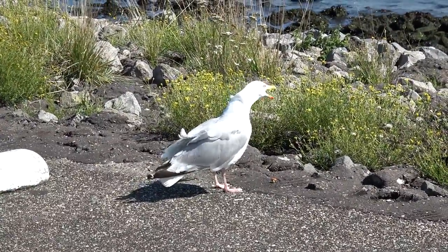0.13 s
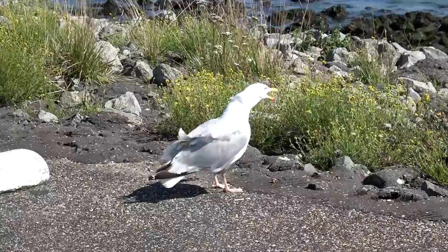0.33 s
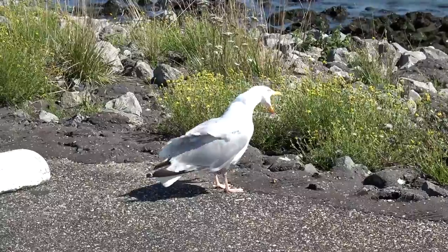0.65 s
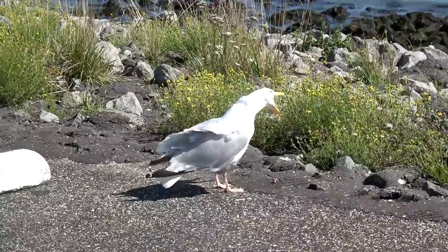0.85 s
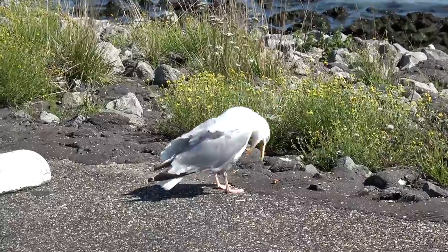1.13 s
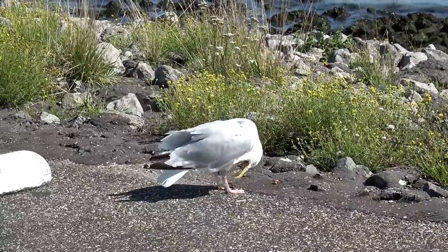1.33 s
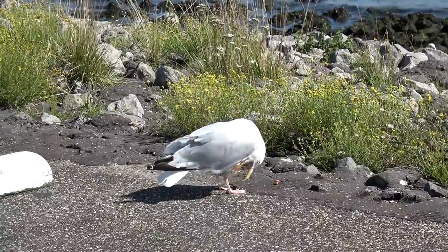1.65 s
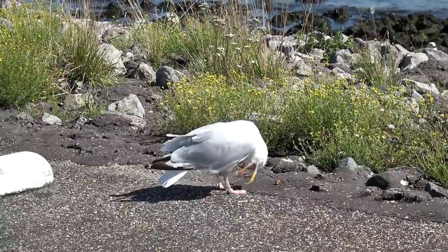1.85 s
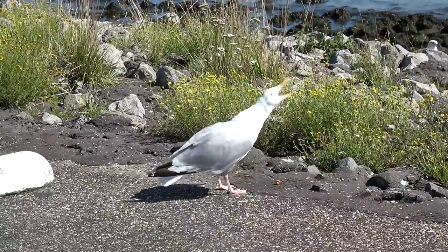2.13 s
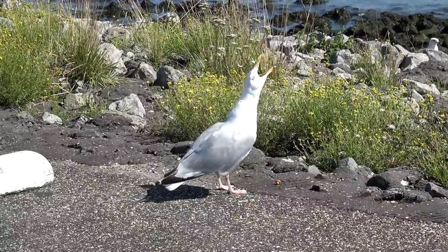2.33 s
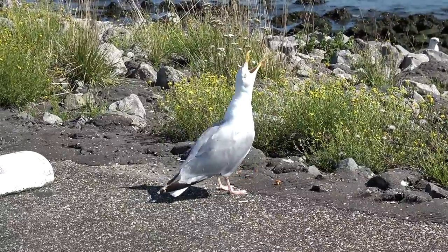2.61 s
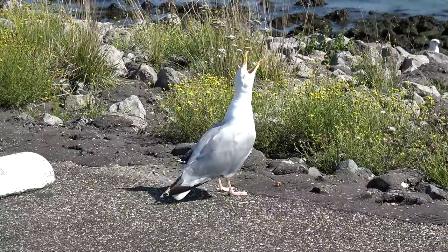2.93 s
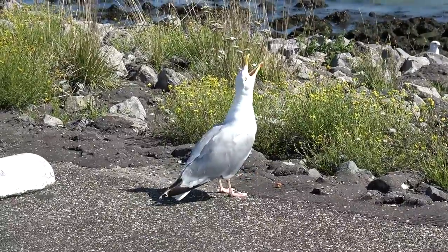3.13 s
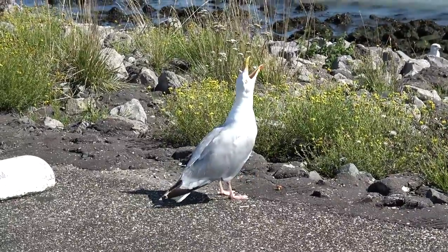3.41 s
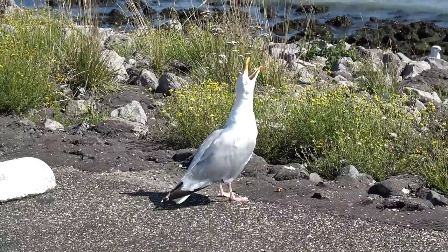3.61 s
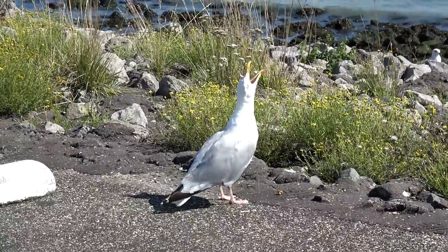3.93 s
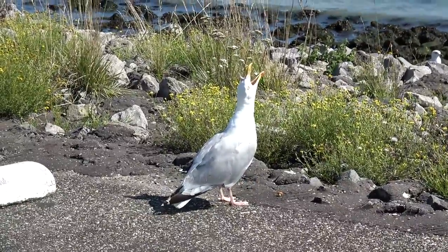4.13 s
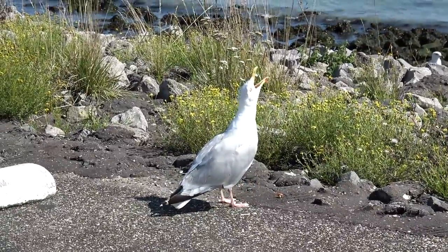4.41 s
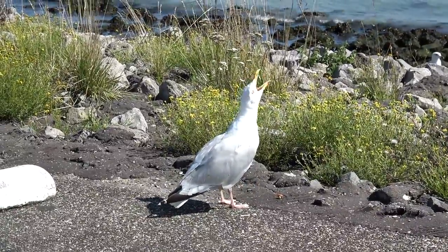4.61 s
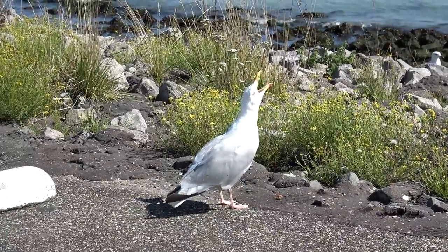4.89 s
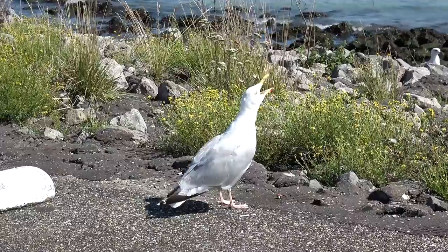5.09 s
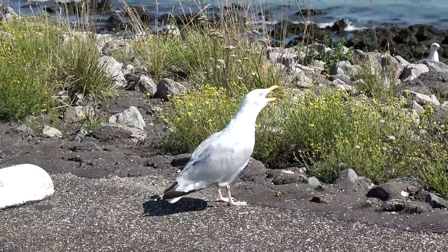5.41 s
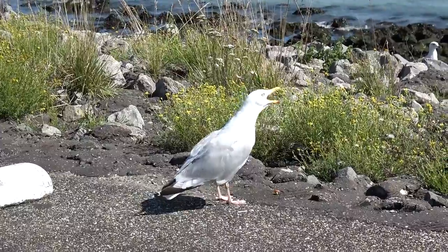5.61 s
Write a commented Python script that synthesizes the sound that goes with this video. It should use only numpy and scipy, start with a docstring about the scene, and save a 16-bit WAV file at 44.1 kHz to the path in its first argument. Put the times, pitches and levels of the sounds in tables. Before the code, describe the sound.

Two large gulls call over each other on a rocky shore, a mewing, wailing bird breaking into loud rapid yelps above faint low surf.

```python
"""A gull's mew and a small tick open the scene, then a second gull yelps and the two duel.
Each yelp starts as a rasp of irregular slaps, locks into a stack of harmonics, may flip to an upper
register, and falls in pitch. Turbulent hiss rides on the sharper pulses of the two voices.
The rocks answer with faint delayed copies and a decaying scatter of noise.
Shaped noise makes the low surf and breeze, and a wavering sine the distant hum beneath them."""
import sys
import numpy as np
from scipy import signal
from scipy.fft import rfft, irfft, next_fast_len
from scipy.io import wavfile
from scipy.ndimage import uniform_filter1d, minimum_filter1d, map_coordinates

SR = 44100
rng = np.random.default_rng(int(sys.argv[2]) if len(sys.argv) > 2 else 0)


def master(y):
    """Save y as 16-bit WAV."""
    cut = np.clip(np.atleast_2d(y).T, -1, 1)
    pcm = np.round(cut * 32767)  # scale
    wavfile.write(sys.argv[1], SR, pcm.astype(np.int16))


N = 253575  # length in samples
TOP_HZ = 15700  # upper band limit of the whole scene

# Yelps of the two birds. Each row: start in seconds; durations of rasp, rise, upper register and fall
# in seconds; crest pitch (before any flip) in Hz, pitch early in the fall in Hz; effort in dB before
# throat and envelope; offsets of the second and third harmonics in dB.
CALLER_YELPS = [ (2.2, 0.042, 0.056, 0.081, 0.02, 1157, 1040, -7.5, 1.5, 1),
                (2.5, 0.038, 0.062, 0.074, 0.019, 1159, 1077, -5.5, -0.5, 0.5),
                (2.81, 0.035, 0.059, 0.068, 0.026, 1148, 1060, -7, 0.5, 0),
                (3.105, .053, 0.057, 0.059, 0.03, 1143, 1050, -7.5, 0, 0),
                (3.418, 0.037, 0.057, 0.06, 0.03, 1145, 1045, -7.5, 0, 0),
                (3.724, 0.035, 0.059, 0.033, 0.057, 1136, 1055, -7, -0.5, 0),
                (4.03, .04, .065, 0.00053, 0.082, 1136, 1064, -6.5, -0.5, 0.5),
                (4.342, 0.039, 0.059, 0, .087, 1131, 1068, -6, 0, -0.5),
                (4.656, 0.043, 0.062, 0.0047, 0.073, 1151, 1053, -6, -2, -1.5),
                (4.967, 0.046, 0.049, 0, 0.09, 1137, 1055, -5.5, 1, -1.5)]
RIVAL_YELPS = [ (.212, 0.025, 0.2, 0, 0.059, 1291, 1238, -5.5, -16, 4.5),
               (.597, 0.03, 0.072, 0.00052, 0.059, 1187, 1152, -6, -1, -6.5),
               (.882, 0.03, 0.071, 0.00017, 0.064, 1206, 1136, -6.5, 1, -4),
               (1.172, 0.032, 0.064, 0.0016, 0.061, 1202, 1136, -5, 0, -5),
               (1.465, .03, .062, 0.0093, 0.057, 1216, 1121, -6.5, 0, -5),
               (1.76, .035, 0.044, 0.026, 0.045, 1218, 1123, -6.5, -4, -2),
               (2.068, .037, 0.035, 0.021, 0.052, 1213, 1098, -7, -5.5, 0),
               (2.385, 0.023, .023, 0.023, 0.056, 1216, 1110, -10.5, -5.5, 1.5),
               (2.69, 0.033, 0.021, 0.031, 0.057, 1181, 1086, -12.5, -4, 2.5),
               (3.11, .02, 0.01, 0.017, 0.057, 1158, 1058, -14.5, -4, -0.5)]
# Sharpness of the pulses, a row each for the rise, the upper register and the fall.
# Each row: offset of the third harmonic in dB, offset of the high overtones in dB.
CALLER_EDGE = [(1.5, -1.5), (-1.5, 0), (.5, -2)]
RIVAL_EDGE = [(-4.5, 0.5), (-9, 7), (1.5, -0.5)]
# Other notes of the caller, long and short, one curve each: mews, wails, squeals and two short
# closing barks. Each row of a curve: time in seconds, pitch in Hz, effort in dB before the throat.
MEWS = [
    [(0, 954.5, -14), (.214, 943.5, -14)],
    [(.675, 971, -12), (.79, 981, -11.5), (.97, 1078, -13), (1.022, 1000, -14)],
]
WAILS = [
    [(1.27, 1174, -10.5), (1.405, 1181, -9.5), (1.415, 1287, -11), (1.455, 1329, -16), (1.645, 1392, -11.5)],
    [(1.653, 1161, -9.5), (1.675, 1108, -2.5), (1.697, 856, -18)],
    [(1.885, 1124, -10.5), (1.93, 1170, -9.5), (2.008, 1219, -8), (2.034, 1408, -8)],
]
SQUEALS = [
    [(1.456, 1926, -0.5), (1.49, 1999, -8), (1.633, 2022, -7), (1.642, 1645, -6), (1.657, 1535, -0.5)],
    [(2.032, 2026, -2.5), (2.083, 1963, -3), (2.087, 1402, 0), (2.104, 1240, -14.5)],
]
CLOSING_BARKS = [
    [(5.35, 1199, -9), (5.368, 1239, -12.5), (5.43, 1132, -4.5), (5.455, 1152, -8)],
    [(5.714, 1228, -15), (5.75, 1264, -4)],
]
# Posture of the caller. Each row: time in seconds, lift of the head (0 bowed, 1 thrown back, beak wide).
HEAD = [(2.28, 0.023), (2.39, 0.87), (5.15, 1), (5.45, 0.53)]
# Resonances of throat and beak that the three lowest harmonics sweep through: the caller bowed, the
# caller with its head back, and the rival. Each row: frequency in Hz, gain in dB.
BOWED = [(950, -12.5), (1080, -20.5), (1190, 0), (1550, -5), (1950, -8.5), (2300, -8), (2620, -22.5),
         (2900, -35.5), (3200, -19), (3520, -18), (3850, -31), (6000, -37.5)]
RAISED = [(880, -18.5), (1010, -11.5), (1070, -6.5), (1150, -0.5), (1230, 0.5), (1320, -2.5), (1800, -21.5),
          (2040, -15.5), (2400, -23.5), (2600, -8.5), (2780, -11.5), (3080, -3), (3220, -11), (3420, -27.5),
          (3600, -24.5), (3900, -26.5)]
RIVAL_THROAT = [(880, -10.5), (1090, -2.5), (1220, -1.5), (1390, -5.5), (1900, -17.5), (2400, -13.5),
                (2900, -11.5), (3250, -7.5), (3600, -23.5), (4100, -41.5)]
# Throat colour of the high overtones, relative to the strength of the low ones.
# Each row: frequency in Hz, gain in dB.
THROAT = [(3900, -15.5), (4350, -17.5), (4700, -24), (5300, -34.5), (6200, -32), (7400, -40), (8600, -45),
          (10000, -50), (12000, -47.5), (15000, -65.5)]
# Strain in both voices. Each row: time in seconds, added sharpness of the pulses in dB.
STRAIN = [(0, -0.5), (2.3, 0.5), (4.2, -3), (5.1, -1.5), (5.4, 9)]
# Rattling stretches of the caller outside its yelps; those locked first run backwards, loosening.
# Each row: loosest at in seconds, almost locked at in seconds, level in dB before the swell.
CALLER_RASPS = [(1.612, 1.66, -23.5), (1.85, 1.9, -18), (5.303, 5.362, -18), (5.495, 5.437, -14),
                (5.667, 5.716, -16.5)]
# Upper resonances that the slaps ring. Each row: frequency in Hz, relative gain in dB.
RASP_COLOUR = [(250, -18), (370, -2.5), (520, -20), (720, -0.5), (1100, -29), (2000, -15), (2750, 1),
               (3300, -5), (4100, -17), (5200, -26), (6600, -32), (9000, -42), (15000, -61.5)]
# Decay of the scatter from the rocks. Each row: frequency in Hz, time to fall by 60 dB in seconds.
ROCKS = [(2000, 0.6), (10000, 0.028)]
# Spectrum of surf and breeze. Each row: frequency in Hz, relative density in dB.
SHORE = [(20, -23.5), (45, -1.5), (90, -4.5), (160, -9.5), (330, -13), (550, -20), (1600, -25),
         (3000, -33.5), (8000, -44.5), (15000, -61)]
# Stereo width of the shore. Each row: frequency in Hz, side over mid in dB.
SHORE_WIDTH = [(30, -22), (120, -18), (300, -10.5), (8000, -3.5)]
# Surf. Each row: time in seconds, level in dB about which it fluctuates.
SURF = [(0, -34.5), (3, -45), (4.299, -42)]

FLIP, FLIP_SAG = 1.14, 0.08  # upper register over the crest pitch, and how far that ratio sinks
# Time constants in seconds: the pitch scoops up, leaves its crest, gives way at the end.
SCOOP_S, RELAX_S, COLLAPSE_S = 0.018, 0.0098, 0.011
# Depth in dB and time constant in seconds of the fades at the ends of a yelp.
ATTACK_DB, ATTACK_S = 7, 0.009
RELEASE_DB, RELEASE_S = 6.5, 0.01


def yelps(rows, throat, edges, swell_db, scoop, climb, sag_hz_per_s, last_hz, rasp_db):
    """Register change: each yelp rattles, locks, climbs, may flip upward, sags and collapses."""
    notes, rasps = [], []
    overlap_s = 0.011  # the rasp outlasts the locking by this much
    for start, rasp_s, rise_s, high_s, fall_s, crest_hz, fall_hz, db, second_db, third_db in rows:
        lock, crest, drop, end = start + np.cumsum(np.abs([rasp_s, rise_s, high_s, fall_s]))
        t = np.arange(lock, end, 1 / SR)

        rising = 1 - climb * (crest - t) / rise_s - scoop * np.exp((lock - t) / SCOOP_S)
        rising = crest_hz * rising
        high = crest_hz * np.interp(t, [crest, drop], [FLIP, FLIP - FLIP_SAG])
        falling = fall_hz + (crest_hz - fall_hz) * np.exp(-np.abs(t - crest) / RELAX_S)
        falling -= sag_hz_per_s * (t - drop)
        falling += (last_hz - falling) * np.exp((t - end) / COLLAPSE_S)
        pitch = np.select([t < crest, t < drop], [rising, high], falling)
        pitch = uniform_filter1d(pitch, size=200)

        effort_db = db + swell_db * np.interp(t, [lock, crest, end], [-1, 0.5, 0])
        effort_db -= ATTACK_DB * np.exp((lock - t) / ATTACK_S)
        effort_db -= RELEASE_DB * np.exp((t - end) / RELEASE_S)

        stage = np.searchsorted([crest, drop], t)  # 0 rise, 1 upper register, 2 fall
        edge = np.array(edges, float)[stage]
        sharp_db, high_db = uniform_filter1d(edge, size=600, axis=0).T
        notes.append(sung(t, pitch, effort_db, throat, second_db, third_db + sharp_db, high_db))
        rasps.append((start, lock + overlap_s, db + rasp_db))
    return notes, rasps


def other_notes(curves, second_db, third_db, high_db):
    """Gliding phonation: the caller's other notes, long and short, follow curves of pitch and effort."""
    notes = []
    for curve in curves:
        s, pitch, db = np.transpose(curve)
        t = np.arange(s.min(), s.max(), 1 / SR)
        pitch, db = np.interp(t, s, pitch), np.interp(t, s, db)
        notes.append(sung(t, pitch, db, caller_throat, second_db, third_db, high_db))
    return notes


def sung(t, pitch, db, throat, second_db=0, third_db=0, high_db=0):
    """Source and filter: the throat's resonances weight the three lowest harmonics of the source."""
    first, second, third = [db + throat(t, k * pitch) for k in range(1, 4)]
    lift = high_db + np.zeros(len(t))
    # columns: s, pitch Hz, three harmonic levels dB, lift of the high overtones dB
    return np.column_stack([t, pitch, first, second + second_db, third + third_db, lift])


def caller_throat(t, hz):
    """Vocal-tract tuning: the resonances shift as the caller throws its head back."""
    lift = np.clip(np.interp(t, *np.transpose(HEAD)), 0, 1)
    return (1 - lift) * along(BOWED, hz) + lift * along(RAISED, hz)


def rival_throat(t, hz):
    """Fixed resonances: the rival holds one posture."""
    return along(RIVAL_THROAT, hz)


def gull(notes, jitter, steadying_s=0.055, flutter_db=5.0, halves_db=-6, settle_s=0.0028):
    """Periodic oscillation: the locked syrinx gives harmonics of one slightly unsteady pitch."""
    calm, waver, shimmer_db = 0.002, 0.002, 0.25  # fast and slow pitch ratios, level wobble
    voice, clock = np.zeros(N), np.arange(N) / SR
    for note in notes:
        s, *columns = np.transpose(note)
        s = np.sort(s)
        live = (clock > s[0] - 0.01) & (clock < s[-1] + 0.01)
        t = clock[live]
        size = len(t)
        pitch, *low_db, high_db = [np.interp(t, s, c) for c in columns]

        since_lock = np.abs(t - s[0])
        unsteady = calm + jitter * np.exp(-since_lock / steadying_s)  # hoarse just after it locks
        pitch = pitch * (1 + unsteady * wobble(900, size) + waver * wobble(70, size))
        phase = 2 * np.pi * np.cumsum(pitch) / SR

        def partial(k, db):
            """Sinusoid at k times the pitch, silent above the band limit."""
            below_top = k * pitch < TOP_HZ
            return amp(db) * below_top * np.cos(k * phase + rng.uniform(0, 2 * np.pi))

        def flutter():
            """Random level modulation in dB."""
            return flutter_db * wobble(60.8, size)

        # a loud note with a strong third harmonic has sharp pulses, so all overtones rise
        edge_db = (np.max(low_db, axis=0) + low_db[2]) / 2 + np.interp(t, *np.transpose(STRAIN))
        tone = sum(partial(k + 1, db) for k, db in enumerate(low_db))
        for k in range(4, 15):
            tone += partial(k, edge_db + high_db + along(THROAT, k * pitch) + flutter())

        # at first every other cycle is stronger: lines halfway between harmonics, which soon settle
        unsettled = np.exp(-since_lock / settle_s)
        for k in (1, 2):
            tone += unsettled * partial(k + 0.5, edge_db + halves_db * k + flutter())
        shimmer = amp(shimmer_db * wobble(400, size))
        voice[live] += tone * shimmer * gate(t, s[0], s[-1], edge=0.0018)
    return voice


def rasp(rasps, locked_hz=540, swell_db=10, low_hz=1130, high_hz=1590):
    """Chaos to order: slaps of the syrinx even out near half the pitch and ring a rising resonance."""
    loose_hz, scatter, size_db = 260, 0.4, 3.5  # loosest slap rate, spread of log rate, spread of size
    width_hz, upper_db = 260, -8  # bandwidth of the lowest resonance, level of the upper ones
    drive, closure, t = np.zeros(N), np.zeros(N), np.arange(N) / SR
    for loose, locked, db in rasps:
        start, end = sorted([loose, locked])
        live = (t > start - 0.01) & (t < end + 0.01)
        u = np.clip((t[live] - loose) / (locked - loose), 0, 1)  # 0 loose, 1 locked
        chaos = 1 - u ** 2
        rate = loose_hz + (locked_hz - loose_hz) * u
        rate = rate * np.exp(scatter * chaos * wobble(500, len(u)))
        count = np.floor(np.cumsum(rate) / SR + rng.random())
        sizes = amp(size_db * chaos * rng.standard_normal(len(u)))
        slaps = np.diff(count, prepend=0) * sizes
        level = amp(db - swell_db * (1.5 - u))
        drive[live] += unit(slaps - slaps.mean()) * level * gate(t[live], start, end, edge=0.0042)
        closure[live] = u

    # the lowest resonance is a damped turning pointer whose speed follows the closure
    turn = np.exp(2j * np.pi * np.cumsum(low_hz + (high_hz - low_hz) * closure) / SR)
    pole = np.exp(-np.pi * width_hz / SR)
    gain = np.sqrt(2 * (1 - pole ** 2))
    ring = (turn * signal.lfilter([gain], [1, -pole], drive / turn)).real
    band = signal.butter(4, [850, 1850], "band", fs=SR, output="sos")
    return signal.sosfilt(band, ring) + amp(upper_db) * rung(drive, RASP_COLOUR)


def turbulence(voice, db=-24):
    """Flow noise: air torn by sharp pulses hisses between the harmonics; round notes stay clean."""
    sharp = filtered(voice, lambda f: f ** 4 / (f ** 4 + 2600 ** 4))
    return amp(db) * rung(sharp * rng.standard_normal(N), RASP_COLOUR)


def placed(x, left_db):
    """Intensity stereo: a level difference, left over right in dB, sets the direction."""
    return x * amp([[left_db / 2], [-left_db / 2]])


def rocks(x, tail_db=-29, near_db=-25, far_db=-29, near_s=0.042, far_s=0.16):
    """Reflection and scattering: two discrete echoes, and noise whose treble dies away sooner."""
    hz, t, z = signal.stft(rng.standard_normal((2, SR // 2)), SR, nperseg=256)
    decay = amp(-60 * t / along(ROCKS, hz)[:, None])
    tail = signal.istft(z * decay, SR, nperseg=256)[1]
    tail = tail + tail.mean(axis=0)  # partly alike in both channels
    tail = tail / np.linalg.norm(tail[0])
    scatter = signal.fftconvolve(x[None], tail, axes=1)[:, :N]

    def echoes(f):
        """Response of two pure delays."""
        near = amp(near_db) * np.exp(-2j * np.pi * f * near_s)
        far = amp(far_db) * np.exp(-2j * np.pi * f * far_s)
        return near + far

    return amp(tail_db) * scatter + filtered(x, echoes)


def tick(at_s=0.049, db=-33, t60=0.026):
    """Impact noise: one small dry high-passed burst with exponential decay, like grit under a foot."""
    t = np.arange(N) / SR - at_s
    burst = (t > 0) * amp(db - 60 * np.abs(t) / t60) * rng.standard_normal(N)
    return filtered(burst, lambda f: f ** 4 / (f ** 4 + 4000 ** 4))


def shore(hum_hz=114, hum_db=-48):
    """Broadband noise: surf and breeze rise and sink over a distant hum of wavering pitch and level."""
    def noise():
        """White noise given the shore's spectrum."""
        return unit(filtered(rng.standard_normal(N), lambda f: amp(along(SHORE, f))))

    mid = noise()
    side = filtered(noise(), lambda f: amp(along(SHORE_WIDTH, f)))
    wash = np.array([mid + side, mid - side])
    surf_db = np.interp(np.arange(N) / SR, *np.transpose(SURF)) + wobble(10, N)
    hum = np.sin(2 * np.pi * np.cumsum(hum_hz + 2 * wobble(13, N)) / SR)
    hum = hum * amp(4.9 * wobble(14, N))
    return amp(surf_db) * wash + amp(hum_db) * hum


def amp(db):
    """Level law: decibels to an amplitude ratio."""
    return 10 ** (np.asarray(db) / 20)


def unit(x):
    """Normalisation: scale to an rms of 1."""
    return x / np.sqrt(np.mean(x ** 2) + 1e-20)


def along(points, hz):
    """Logarithmic frequency scale: interpolate (Hz, value) points on it."""
    f, v = np.transpose(points)
    return np.interp(np.log(hz + 1), np.log(f + 1), v)


def wobble(rate, size):
    """Band-limited fluctuation: a smooth random curve with rate knots a second."""
    knots = rng.standard_normal(int(N * rate / SR) + 4)
    return map_coordinates(knots, [np.arange(size) * rate / SR])


def filtered(x, response):
    """Linear filtering: multiply the spectrum by a (complex) response of frequency."""
    m = next_fast_len(N + SR // 2)  # padding keeps delays from wrapping round
    return irfft(rfft(x, m) * response(np.fft.rfftfreq(m, 1 / SR)), m)[..., :N]


def rung(x, colour, size=1024):
    """Minimum phase: a causal filter of the given colour and of energy 1, from the folded cepstrum."""
    cepstrum = irfft(np.log(amp(along(colour, np.fft.rfftfreq(size, 1 / SR)))))
    ring = irfft(np.exp(rfft(2 * cepstrum[:size // 2], size)))
    return signal.fftconvolve(x, ring / np.linalg.norm(ring))[:N]


def gate(t, start, end, edge):
    """Smooth onset and offset: a soft switch, open from start to end."""
    return (1 + np.tanh((t - start) / edge)) * (1 + np.tanh((end - t) / edge)) / 4


def limited(x, ceiling_db=-3.0, hold_s=0.0091):
    """Peak limiting: a smoothed gain turns down whatever would pass the ceiling."""
    size = int(hold_s * SR)
    needed = np.minimum(1, amp(ceiling_db) / (np.abs(x).max(axis=0) + 1e-9))
    return x * uniform_filter1d(minimum_filter1d(needed, size), size)


def scene():
    """Superposition: the caller near the middle, its hoarser rival to the right, the shore around."""
    notes, rasps = yelps(CALLER_YELPS, caller_throat, CALLER_EDGE, swell_db=0.5, scoop=0.0037,
                         climb=0.058, sag_hz_per_s=510, last_hz=887.5, rasp_db=-12)
    notes += other_notes(MEWS, second_db=1.5, third_db=2, high_db=3)
    notes += other_notes(WAILS, second_db=-1.0, third_db=-3.5, high_db=6.0)
    notes += other_notes(SQUEALS, second_db=-1.0, third_db=-1.5, high_db=2)
    notes += other_notes(CLOSING_BARKS, second_db=0.5, third_db=2, high_db=-3.5)
    caller = gull(notes, jitter=0.0056) + rasp(rasps + CALLER_RASPS, swell_db=6.5)

    notes, rasps = yelps(RIVAL_YELPS, rival_throat, RIVAL_EDGE, swell_db=4.5, scoop=0.022,
                         climb=0.098, sag_hz_per_s=1800, last_hz=916, rasp_db=-4.5)
    rival = gull(notes, jitter=0.022, flutter_db=8, halves_db=-3, settle_s=0.014) + rasp(rasps)

    both = caller + rival
    birds = placed(caller, left_db=0.7) + placed(rival, left_db=-4.2)
    return birds + turbulence(both) + rocks(both) + tick() + shore()


def record(dry):
    """Limited range: the loudest peaks are turned down and nothing above the band limit is kept."""
    return filtered(limited(dry), lambda hz: hz < TOP_HZ)


dry = scene()
out = record(dry)
master(out)
```